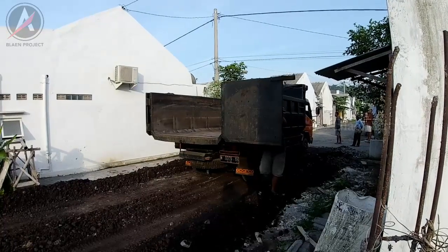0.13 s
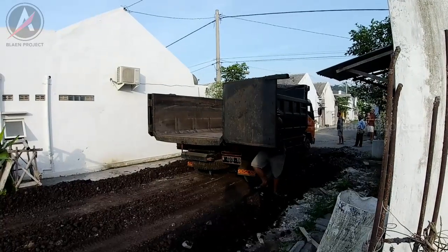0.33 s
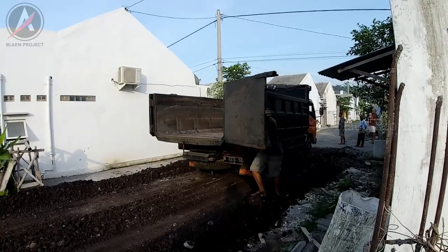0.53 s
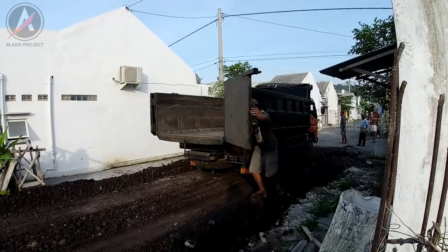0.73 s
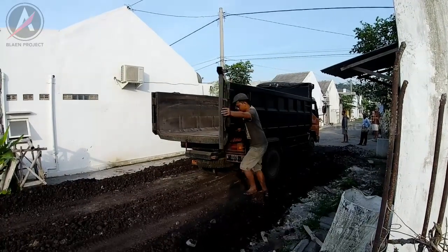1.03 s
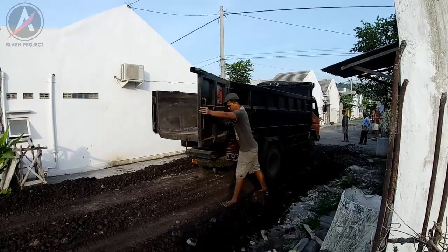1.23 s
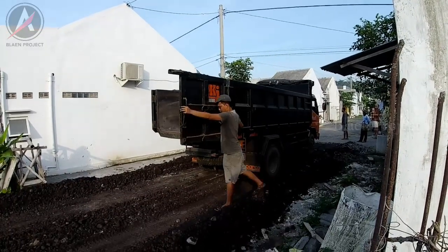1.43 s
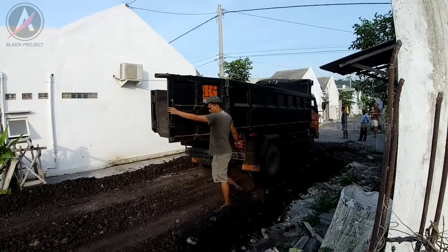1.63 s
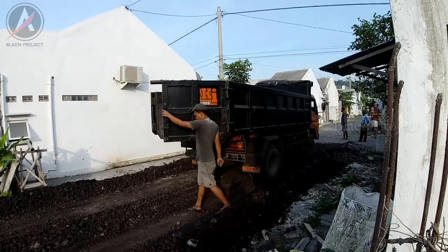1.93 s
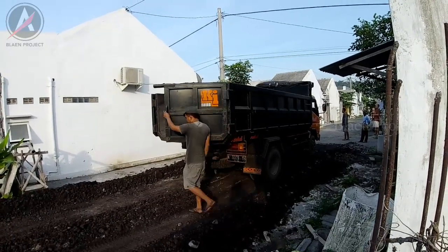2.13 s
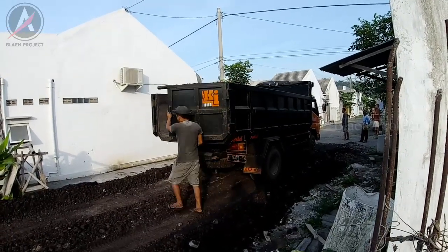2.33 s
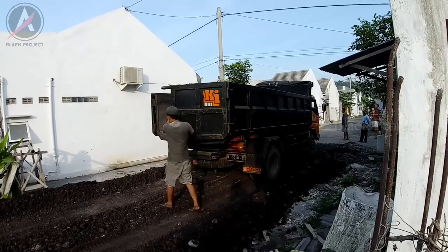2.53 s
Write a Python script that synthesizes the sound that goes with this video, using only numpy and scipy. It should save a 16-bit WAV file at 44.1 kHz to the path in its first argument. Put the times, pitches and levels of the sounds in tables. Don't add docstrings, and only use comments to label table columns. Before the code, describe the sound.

Huge metal clang as a dump truck's tailgate bangs shut and bounces, hollow bed booming and decaying, with a throbbing diesel idling throughout and light chain rattles later; outdoors between walls, the blow distorting the microphone.

```python
import sys
import numpy as np
from scipy import signal
from scipy.fft import rfft, irfft
from scipy.io import wavfile
from scipy.ndimage import uniform_filter1d

SR = 44100
rng = np.random.default_rng(int(sys.argv[2]) if len(sys.argv) > 2 else 0)


def invert_db(x):
    u = np.asarray(x, float) / 20
    return 10 ** u


def inscribe(sig):
    pcm = np.round(np.clip(np.atleast_2d(sig).T, -1, 1) * 32767)
    wavfile.write(sys.argv[1], SR, pcm.astype(np.int16))


N = 119070

# multiple of the firing rate, peak level in dB.
ENGINE_ORDERS = [(.5, -42), (1, -18.3), (1.5, -34), (2, -33), (2.5, -41), (3.5, -48), (5, -48), (7, -45)]
# frequency in Hz, peak level in dB.
STEADY_HUM = [(40.9, -28), (49.4, -42), (100.4, -44.5)]
CYLINDER_KNOCK = [6.5, 3.5, 8, 2]
# frequency in Hz, level in dB per Hz.
CLATTER_SPECTRUM = [(240, -78), (400, 1.5), (425, -10.5), (886, -1.5), (1200, -7), (1510, -7.5),
                    (2970, -16), (4290, -17), (15500, -29.5)]
# frequency in Hz, width in Hz, level in dB.
BLOCK_RESONANCES = [(860, 8, 0), (1540, 230, -2), (2240, 16, -7), (2230, 260, -6), (3830, 120, -14)]
# frequency in Hz, width in Hz, level in dB.
WHISTLES = [(4400, 600, -4), (7150, 350, 0), (10600, 600, -3)]
# frequency in Hz, level in dB per Hz.
RUMBLE_SPECTRUM = [(36, -56), (62, 3.5), (166, -5.5), (183, -2), (253, -11.5), (273, -7.5), (333, -14.5),
                   (422, -19), (600, -15.5), (780, -34), (1320, -120)]
# frequency in Hz, level in dB, T60 in seconds.
LATCH_TOUCH = (.164, [(4630, -39, .07), (8300, -53, .04), (11900, -53, .04)])
# time in seconds, ring level in dB, crash level in dB.
GATE_BLOWS = [
    (0.179, -15.5, -20),
    (0.1836, -0.5, 0),
    (.197, -20, -11),
    (.228, -11, -22),
    (.263, -20, -7.5),
]
# frequency in Hz, level in dB.
PANEL_SPECTRUM = [(41, -36), (70, 4), (462, -3), (541, -21), (761, -4), (1650, -2.5), (1810, -8),
                  (14000, -17), (16000, -28)]
# frequency in Hz, T60 in seconds.
PANEL_T60 = [(80, 0.25), (200, 1), (500, 1), (1200, 0.66), (3000, 0.45), (7000, 0.098), (15000, 0.26)]
# frequency in Hz, level in dB per Hz.
CRASH_SPECTRUM = [(180, -49), (300, 2.5), (889, -31), (1160, 1.5), (1300, -23), (1660, -6), (2550, -9),
                  (2860, -12.5), (3800, -9.5), (6500, -19), (8500, -16.5), (11000, -19.5), (13500, -14.5),
                  (15300, -19)]
# frequency in Hz, T60 in seconds.
CRASH_DECAY = [(500, 0.22), (3000, 0.31), (6500, 0.19), (8300, 0.27), (11000, 0.15), (16000, 0.096)]
# frequency in Hz, level in dB, T60 in seconds.
BED_MODES = [(222, -27, 1.7), (304, -36, 2), (314, -29, 2.4), (324, -24, .9), (346, -32, 2)]
# frequency in Hz, level in dB, T60 in seconds.
LOW_GATE_MODES = [(530, -10, .5), (587, -3, .6), (620, -3, .25), (652, -13, 1.9), (716, -9, .7),
                  (770, -4, .7), (840, -5, .5), (910, -1, .8), (974, -6, 1.15), (1024, -2, .6),
                  (1140, -5, .5)]
# frequency in Hz, level in dB, T60 in seconds.
HIGH_GATE_MODES = [(1211, 0, .3), (1400, -6, .52), (1491, -10, .4), (1626, -6, .5), (1701, -1, .45),
                   (2126, -10, .37), (2347, -2, .32), (2449, -5, .3), (2525, -3, .25), (2622, -1, .3),
                   (3354, -6, .33), (3560, -8, .33), (4032, -7, .31), (4231, -9, .36)]
# frequency in Hz, level in dB, T60 in seconds, gap in Hz,
# a silent moment in seconds.
BEATING_PAIRS = [(206, -10, .85, 9.5, .295), (333, -24.5, 4.3, 1.7, .47), (398, -19.5, 2.2, .55, 1.07),
                 (468, -11, .8, 3, .43)]
# frequency in Hz, level in dB, T60 in seconds.
BOX_MODES = [(102, -20, 0.79), (128.1, -21.5, 1.35), (162.5, -32, 1.5), (190, -15.5, 0.51),
             (315, -44, 0.38)]
# frequency in Hz, level in dB, T60 in seconds.
LATCH_BAR_MODES = [(3300, -24, .12), (3950, -26, .15), (6050, -20, .08), (7600, -31, .2), (7900, -31, .2),
                   (8250, -31, .2), (8700, -32, .15)]
# time in seconds, then level, upper links, pin and scrape in dB.
CHAIN_CLINKS = [
    (.686, -51, 2, -7.5, 5),
    (1.512, -48, 3, -1, 7),
    (1.587, -53, -2, -30, 12),
    (1.768, -55, -9, -35, 0),
]
# frequency in Hz, level in dB, T60 in seconds.
CHAIN_MODES = [(3340, -5, .12), (3910, -1, .16), (4040, -3, .12), (4160, -4, .09), (4300, -1, .17),
               (4610, -5, .15)]
# frequency in Hz, level in dB, T60 in seconds.
UPPER_LINK_MODES = [(5225, -1, .22), (6900, -8, .2), (7250, -9, .2), (7800, -5, .2)]
# frequency in Hz, level in dB, T60 in seconds.
PIN_MODES = [(10060, 0, .8), (11210, -17, .3), (13560, -12, .3)]
# frequency in Hz, level in dB per Hz.
SCRAPE_SPECTRUM = [(500, -12), (1200, -4), (2500, -6), (4000, 1), (5500, -1), (7800, -4), (9000, -16),
                   (14000, -30)]
# time in seconds, frequency in Hz, level in dB.
LINK_KNOCKS = [(.685, 7750, -46), (.687, 5300, -40), (.688, 4300, -34), (.689, 3900, -37),
               (.689, 3350, -38), (.697, 4100, -34), (.699, 4350, -38), (.709, 3950, -41),
               (.719, 2650, -41), (.724, 4000, -43), (.729, 4330, -42), (.735, 4330, -43),
               (.741, 4300, -38), (.748, 3500, -45), (1.513, 5620, -31), (1.513, 5300, -32),
               (1.513, 3900, -33), (1.523, 4200, -36), (1.530, 3250, -42), (1.538, 4400, -41),
               (1.546, 4000, -39), (1.556, 5300, -44), (1.556, 3850, -44), (1.587, 4580, -38),
               (1.588, 7650, -42), (1.590, 3300, -36), (1.600, 3950, -36), (1.602, 4600, -42),
               (1.610, 3900, -42), (1.616, 4600, -43), (1.632, 4650, -41), (1.636, 3500, -41)]
# time in seconds, level in dB.
GRIT_TICKS = [
    (.908, -52),
    (.937, -56),
    (2.052, -55),
]


def evened(x):
    return x / np.sqrt(np.mean(x ** 2) + 1e-20)


def read(points, hz):
    f, value = np.transpose(points)
    return np.interp(np.log(hz + 1), np.log(f + 1), value)


def coloured(points, size):
    white = rfft(rng.standard_normal(size))
    return evened(irfft(white * invert_db(read(points, np.fft.rfftfreq(size, 1 / SR))), size))


def slow(rate_hz):
    t = np.arange(0, N + 200, 200) / SR
    rates = np.geomspace(rate_hz / 10, rate_hz, num=12)
    drift = sum(np.sin(2 * np.pi * (f * t + rng.random())) for f in rates)
    return np.interp(np.arange(N) / SR, t, evened(drift))


def clicks(events):
    out = np.zeros(N)
    for s, db in events:
        out[round(s * SR)] += invert_db(db)
    return out


def place(out, s, sound):
    room = out[round(s * SR):][:len(sound)]
    room += sound[:len(room)]


def ring(modes, length_s, rise_cycles):
    t = np.arange(0, length_s, 1 / SR)
    out = np.zeros(len(t))
    for hz, db, t60 in modes:
        swell = 1 - np.exp(-t * hz / rise_cycles)
        out += invert_db(db - 60 * t / t60) * swell * np.sin(2 * np.pi * (hz * t + rng.random()))
    return out


def dented(modes):
    near = []
    for hz, db, t60 in modes:
        for side in (-1, 1):
            near.append((hz * (1 + .02 * side * rng.uniform(.3, 1)), db, .8 * t60))
    return ring(modes, 2.7, 8) + .5 * ring(near, 2.7, 8)


def dying(x, t60s):
    hz, t, z = signal.stft(x, SR, nperseg=256)
    z = z * invert_db(-60 * t / read(t60s, hz)[:, None])
    return signal.istft(z, SR, nperseg=256)[1][:len(x)]


def throb(turns):
    pipe_lag, half_lead = .32, .34
    out = np.zeros(N)
    for k, db in ENGINE_ORDERS:
        waver = 1 + .08 * slow(3.04) / min(k, 1) ** 2 * np.sqrt(k)
        phase = k * turns - pipe_lag * (k - 1) + half_lead * 2 * (k % 1)
        out += invert_db(db) * waver * np.cos(2 * np.pi * phase)
    return out


def steady_hum():
    t = np.arange(N) / SR
    out = np.zeros(N)
    for hz, db in STEADY_HUM:
        out += invert_db(db) * (1 + .3 * slow(3.04)) * np.cos(2 * np.pi * (hz * t + rng.random()))
    return out


def clatter(turns, fire_hz):
    knock_lag_s, knock_decay_s, knock_share = .0026, .013, .55
    knock = turns - knock_lag_s * fire_hz + 4
    which = knock.astype(int)
    chance_db = 2.2 * rng.uniform(-1.8, 1.2, size=80)
    force = invert_db(np.array(CYLINDER_KNOCK)[which % 4] + chance_db[which])
    decay = np.exp(-(knock % 1) / fire_hz / knock_decay_s)
    flare = knock_share * uniform_filter1d(force * decay, size=400)
    hz = np.fft.rfftfreq(N, 1 / SR)
    bumps = 2.0
    for f, width, _ in BLOCK_RESONANCES:
        bumps = bumps + 1 / (1 + (2 * (hz - f) / width) ** 2)
    for f, width, db in WHISTLES:
        bumps = bumps + invert_db(db) / (1 + (2 * (hz - f) / width) ** 2)
    noise = irfft(rfft(coloured(CLATTER_SPECTRUM, N)) * bumps * (hz < 17000), N)
    treble = signal.sosfilt(signal.butter(2, 3000, "high", fs=SR, output="sos"), noise)
    return invert_db(-43.5) * evened(noise * (1 + flare) - treble * .7 * flare)


def exhaust_rumble():
    return invert_db(-38) * coloured(RUMBLE_SPECTRUM, N) * invert_db(1.2 * slow(21))


def engine():
    fire_hz, first_fire_s = 22.87, .0173
    turns = (np.arange(N) / SR - first_fire_s) * fire_hz
    return throb(turns) + steady_hum() + clatter(turns, fire_hz) + exhaust_rumble()


def hinge_groan():
    close_s, rise_s = .18, .045
    t = np.arange(N) / SR
    groan = coloured([(120, -16), (250, 13), (500, -34), (1500, -12), (5000, -26.5)], N)
    return invert_db(-36) * groan * np.exp(np.minimum(t - close_s, 0) / rise_s) * (t < close_s)


def latch_touch():
    out = np.zeros(N)
    place(out, LATCH_TOUCH[0], ring(LATCH_TOUCH[1], 1, 6.2))
    return out


def panels():
    split_hz, count = 1500, 700
    hz = np.concatenate([np.geomspace(75, split_hz, num=200), rng.uniform(split_hz, 9000, count - 200)])
    hz = np.sort(hz)
    spacing = np.where(hz < split_hz, hz / 60, 15.)
    level = read(PANEL_SPECTRUM, hz) + 10 * np.log10(spacing) + 2.5 * rng.standard_normal(len(hz))
    t60 = read(PANEL_T60, hz) * invert_db(rng.standard_normal(len(hz)))
    rows = np.transpose([hz, level, t60])
    low = hz < split_hz
    sheet = ring(rows[low], .9, .61)
    short = ring(rows[~low], .31, .61)
    sheet[:len(short)] += short * np.hanning(2 * len(short))[len(short):] ** .5
    body = np.zeros(SR * 3 // 2)
    body[:len(sheet)] = invert_db(-10) * sheet / np.sqrt(np.mean(sheet[:2000] ** 2))
    return signal.fftconvolve(clicks([row[:2] for row in GATE_BLOWS]), body)[:N]


def crashes():
    size, contact_s = SR // 2, .0009
    clumps = evened(uniform_filter1d(rng.standard_normal(size // 2 + 1), size=15))
    grain = invert_db(3 * np.tanh(clumps) * 2)
    onset = 1 - np.exp(-np.arange(size) / SR / contact_s)
    out = np.zeros(N)
    for s, _, db in GATE_BLOWS:
        noise = evened(irfft(rfft(coloured(CRASH_SPECTRUM, size)) * grain))
        place(out, s, invert_db(-5 + db) * dying(noise, CRASH_DECAY) * onset)
    return out


def gate_ring():
    blow_s = GATE_BLOWS[1][0]
    t = round(blow_s * SR) / SR + np.arange(N) / SR
    sound = invert_db(3.5) * ring(BED_MODES, 2.7, 8)
    sound += invert_db(-14.5) * dented(LOW_GATE_MODES) + invert_db(-13.5) * dented(HIGH_GATE_MODES)
    for hz, db, t60, gap_hz, silent_s in BEATING_PAIRS:
        beat = np.sin(np.pi * gap_hz * (t - silent_s))
        sound += ring([(hz, db, t60)], 2.7, 8)[:N] * beat
    out = np.zeros(N)
    place(out, blow_s, sound)
    return out


def box_boom():
    out = np.zeros(N)
    place(out, .226, ring(BOX_MODES, 1, .92))
    return out


def rebound():
    out = np.zeros(N)
    place(out, GATE_BLOWS[4][0], ring(LATCH_BAR_MODES, 1, 8))
    return out


def chain():
    out, t = np.zeros(N), np.arange(SR) / SR
    for s, hz, db in LINK_KNOCKS:
        place(out, s, ring([(hz, db, .045)], .25, 5))
    for s, db, upper_db, pin_db, scrape_db in CHAIN_CLINKS:
        links = ring(CHAIN_MODES, 1, 1.5) + invert_db(upper_db) * ring(UPPER_LINK_MODES, 1, 1.6)
        pin = invert_db(pin_db) * ring(PIN_MODES, 1, 110) * (1 - .34 * np.cos(2 * np.pi * 11 * t))
        scrape = coloured(SCRAPE_SPECTRUM, SR) * invert_db(scrape_db - 60 * t / .32)
        place(out, s, invert_db(db) * (links + pin + scrape))
    return out


def grit():
    tick = np.diff(rng.standard_normal(200)) * invert_db(-60 * np.arange(199) / SR / .008)
    return signal.oaconvolve(clicks(GRIT_TICKS), tick)[:N]


def lane(x):
    t, taps = np.arange(SR) / SR, np.zeros(SR)
    grid = np.arange(400, SR - 22, 22)
    taps[grid + rng.integers(0, 22, len(grid))] = 1
    taps *= rng.choice([-1., 1.], SR) * invert_db(-60 * t / .65)
    taps = signal.lfilter([.3], [1, -.7], taps)
    return x + invert_db(-18.5) * signal.fftconvolve(x, taps / np.linalg.norm(taps))[:N]


def scene():
    gate = hinge_groan() + panels() + crashes() + gate_ring() + box_boom() + rebound()
    latch = latch_touch() + chain() + grit()
    return (engine() + lane(gate + latch))[None]


def roll_off(x):
    return signal.sosfilt(signal.butter(12, 16320, fs=SR, output="sos"), x)


def record(dry):
    ceiling, knee, edge_hz = 1.0, 7, 15600
    x = dry / (1 + abs(dry / ceiling) ** knee) ** (1 / knee)
    lowpass = signal.firwin(601, edge_hz, window=("kaiser", 7), fs=SR)
    mix = signal.oaconvolve(x, lowpass[None], "same")
    return roll_off(mix)


dry = scene()
out = record(dry)
inscribe(out)
```